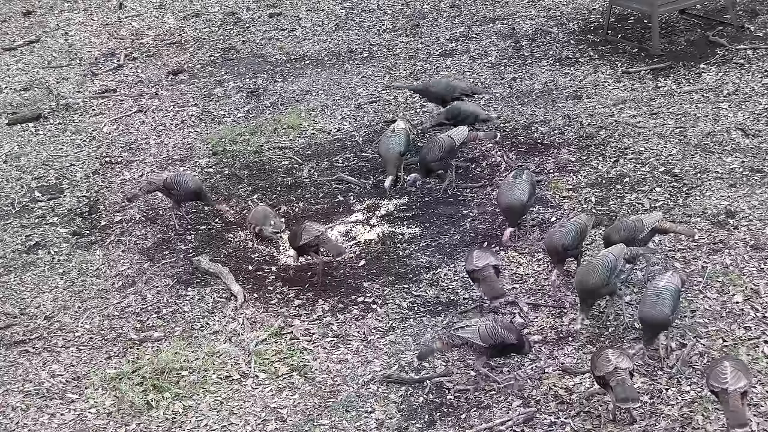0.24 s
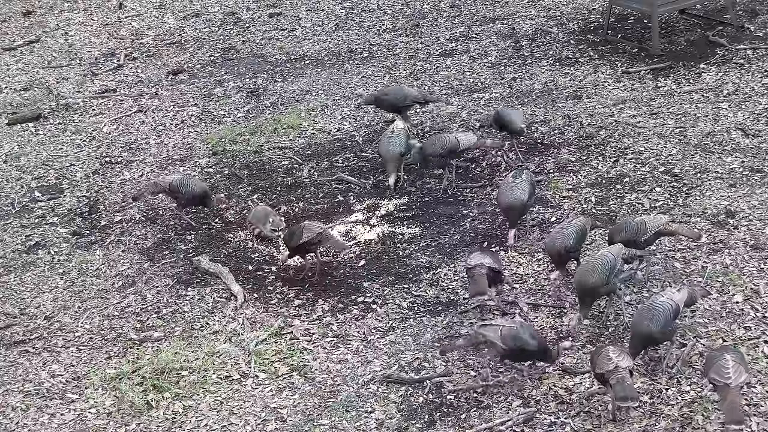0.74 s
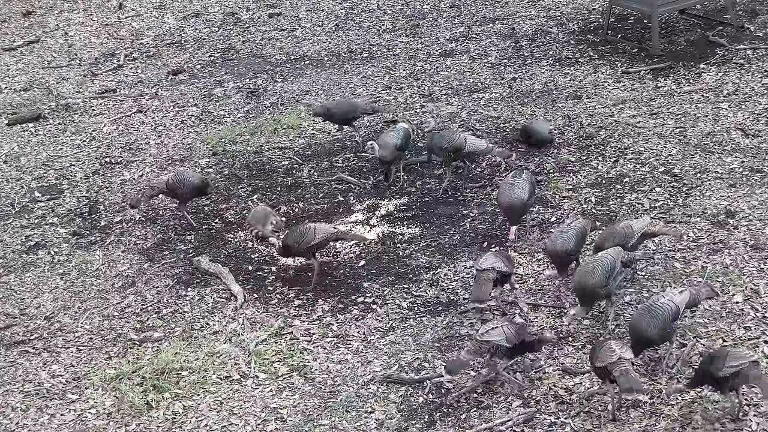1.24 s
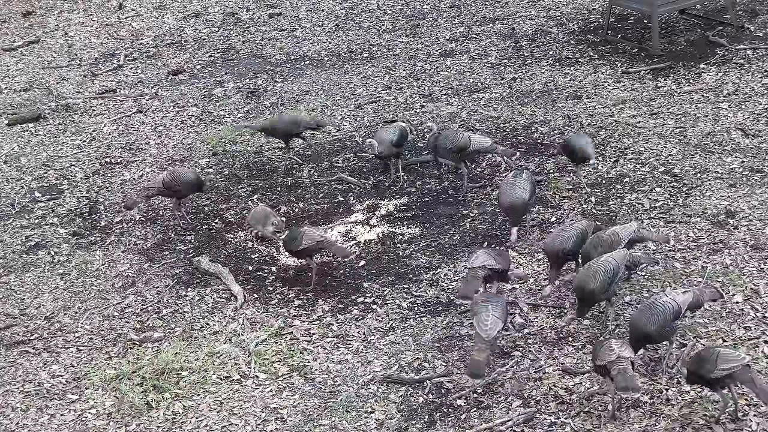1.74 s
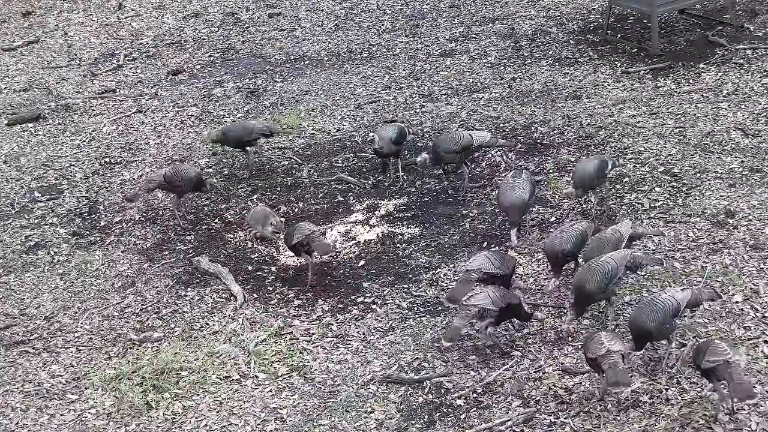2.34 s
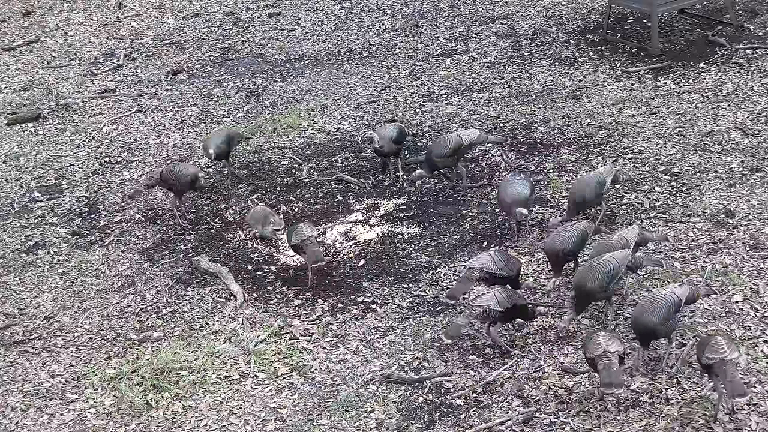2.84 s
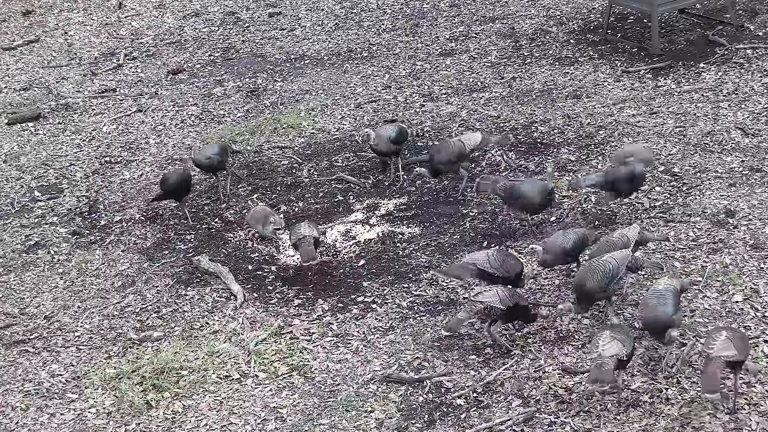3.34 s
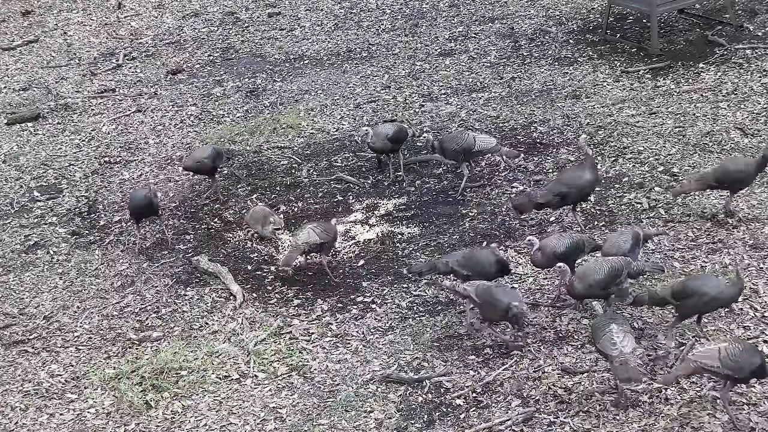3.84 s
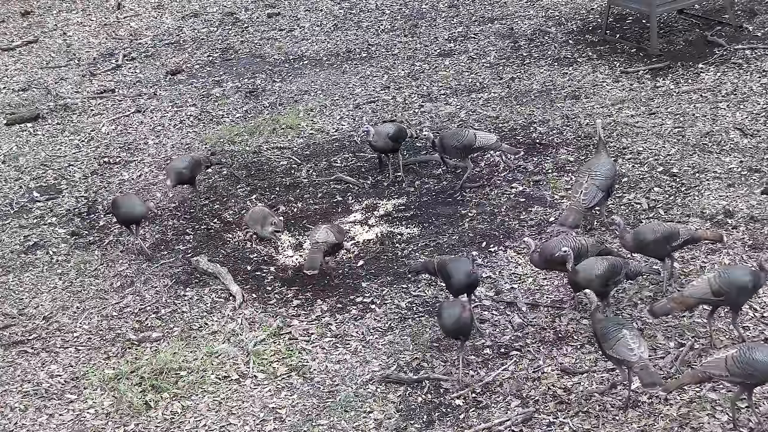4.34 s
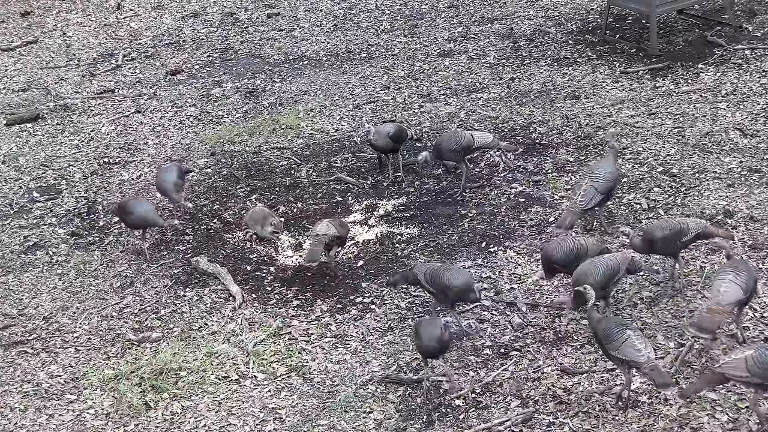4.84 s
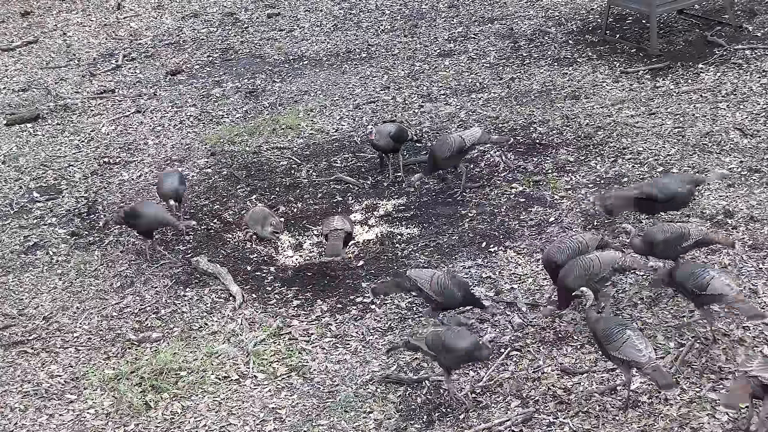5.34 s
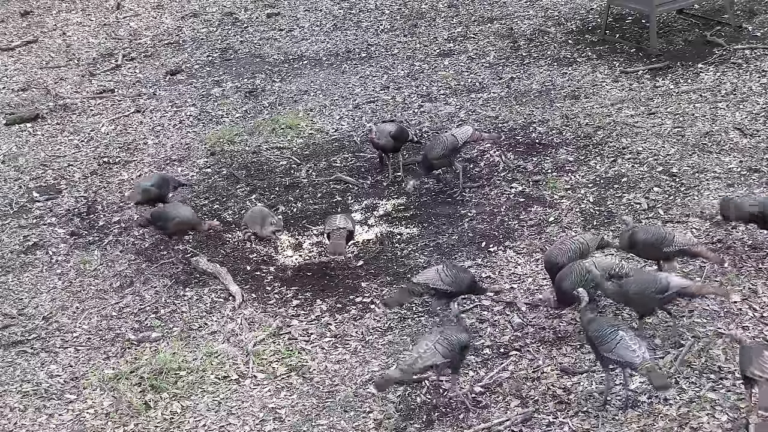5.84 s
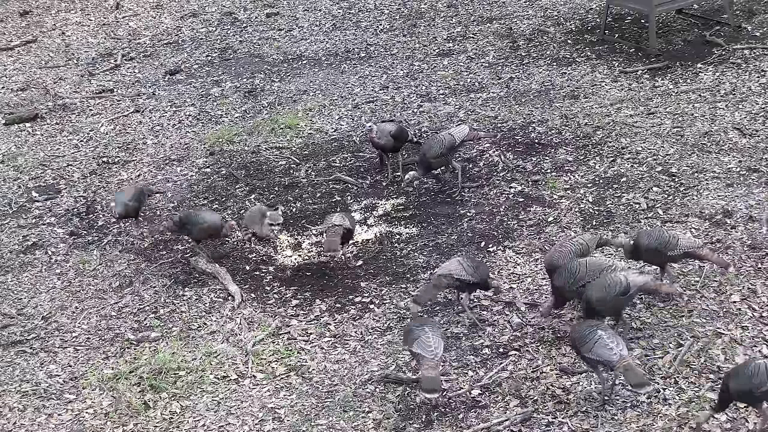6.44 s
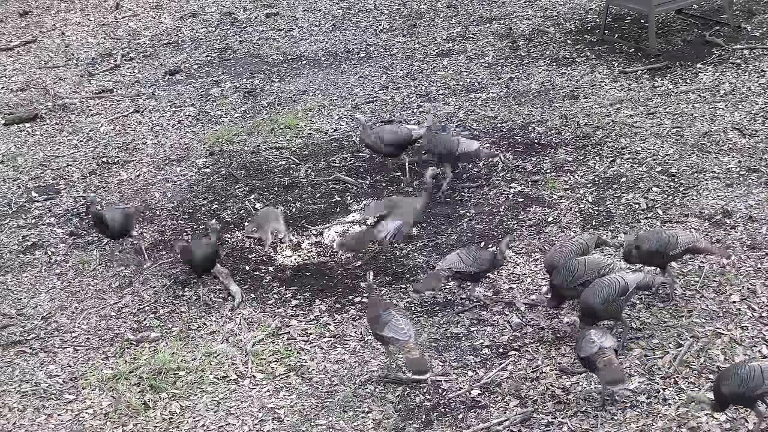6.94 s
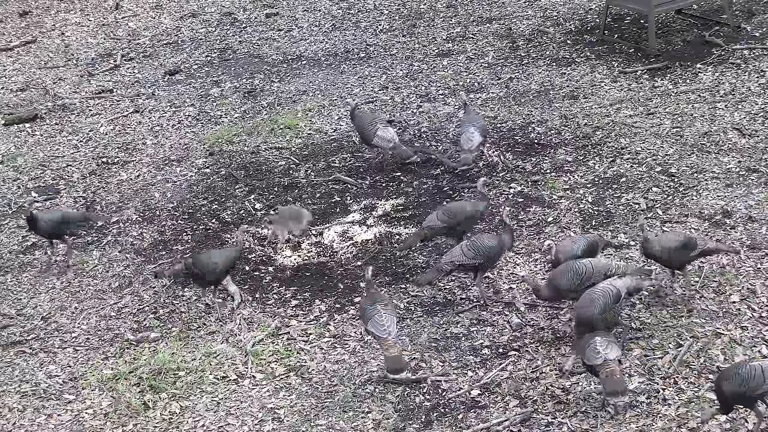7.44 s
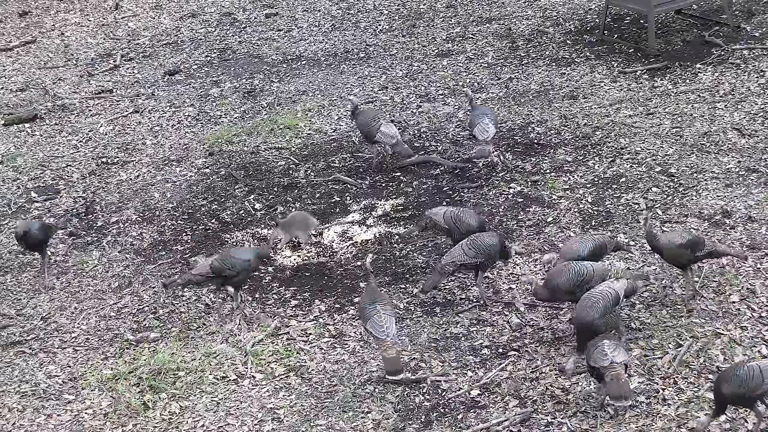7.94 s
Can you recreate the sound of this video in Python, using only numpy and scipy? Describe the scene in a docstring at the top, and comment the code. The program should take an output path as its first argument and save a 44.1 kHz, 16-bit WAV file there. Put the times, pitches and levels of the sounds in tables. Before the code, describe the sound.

Wild turkeys forage quietly on a woodland floor, heard almost in mono with a slight, dull echo. Throughout, many feet shuffle, crunch and rake through dry leaves, dotted with small beak knocks on corn and twigs and the bright snaps of leaf stalks. A low rumble lies underneath, and soft gusts buffet the microphone during the first two seconds. A handful of short, soft, whistled clucks bunch between the start and about 1.6 seconds. The rustling eases briefly, then at 3.2 seconds one bird flicks a wing, a quick crack of stiff feathers. The feet grow busier afterwards, with raking scratches around 3.5 to 4.7 seconds and faint clucks near 3.3 and 5 seconds. Pecks cluster from 5 to 7 seconds. The loudest cluck, very brief, comes at 6.8 seconds, and the rustling continues until the end at about 8 seconds.

```python
"""Wild turkeys feed on corn among dry leaves on a woodland floor, heard almost in mono.
Over a low rumble and early gusts of breeze, feet shuffle, crunch and rake through the litter.
Soft whistled clucks bunch in the first two seconds; beaks knock on kernels and twigs, leaf stalks snap.
At 3.2 s one bird flicks a wing, stiff feathers slapping past one another, and the feet grow busier.
The loudest cluck comes at 6.8 s, and the rustling carries on to the end."""
import sys
import numpy as np
from scipy import signal
from scipy.fft import rfft, irfft
from scipy.io import wavfile

SR = 44100
rng = np.random.default_rng(int(sys.argv[2]) if len(sys.argv) > 2 else 0)


def to_wav(sig):
    """Store sig (one row per channel, or 1-D mono) as 16-bit WAV at the path in sys.argv[1].

    Samples outside -1..1 are clipped; the rate is SR.
    """
    pcm = np.clip(np.atleast_2d(sig), -1, 1) * 32767
    pcm = np.round(pcm).astype(np.int16)
    wavfile.write(sys.argv[1], SR, pcm.T)  # frames by channels


N = 361619

# how busy the flock's feet are: (time [s], rustle level [dB])
FLOCK_ACTIVITY = [(0, -71), (0.25, -55), (1.3, -59), (1.63, -62), (2.05, -51.5), (2.3, -61.5), (3.0, -61),
                  (3.35, -51), (3.68, -51), (3.87, -49), (4.47, -57), (4.9, -54.5), (5.45, -50),
                  (6.0, -53.5), (6.22, -54.5), (6.85, -50.5), (7.01, -52.5), (7.2, -46.5), (7.45, -52),
                  (8.2, -54.5)]
# tone colour of a hard little snap: (frequency [Hz], relative level [dB])
SNAP_SPECTRUM = [(300, -17), (1000, -12), (2500, -8), (5000, 0), (6800, -2), (8400, 1), (10300, -7),
                 (13500, -4), (16000, -13)]


def gain_of(db):
    """Decibels to amplitude."""
    return 10 ** (np.asarray(db) / 20)


def unit_rms(x):
    """Scales to an rms of one."""
    return x / np.sqrt(np.mean(x ** 2) + 1e-20)


def eq_gain(spectrum, hz):
    """Gain of a (Hz, dB) spectrum, read on a log-frequency axis."""
    f, db = np.transpose(spectrum)
    return gain_of(np.interp(np.log(hz + 1), np.log(f + 1), db))


def curve(rows):
    """A (time, value) control curve at every sample."""
    return np.interp(np.arange(N) / SR, *np.transpose(rows))


def add(mix, s, sound):
    """Mixes a sound in at s seconds."""
    part = mix[max(round(s * SR), 0):][:len(sound)]
    part += sound[:len(part)]


def wander(hz):
    """Random drift of rms one, rolling off above the given rate."""
    f = np.fft.rfftfreq(N, 1 / SR)
    return unit_rms(irfft(rfft(rng.standard_normal(N)) / (1 + (f / hz) ** 4), N))


def noise(spectrum):
    """Steady noise with the given spectrum."""
    gain = eq_gain(spectrum, np.fft.rfftfreq(N, 1 / SR))
    return unit_rms(irfft(rfft(rng.standard_normal(N)) * gain, N))


def click(spectrum, size=2048):
    """A minimum-phase click of energy one with the given spectrum."""
    log_gain = np.log(eq_gain(spectrum, abs(np.fft.fftfreq(size, 1 / SR))))
    pulse = np.fft.ifft(np.exp(np.conj(signal.hilbert(log_gain)))).real[:size // 2]
    return pulse / np.linalg.norm(pulse)


def woodland_air(hush_db=-48.5, swell_db=1.1, breeze_trim_db=-2):
    """A bed of distant rumble and hush, with a soft breeze buffeting the microphone."""
    # still air: (frequency [Hz], relative level [dB])
    hush_spectrum = [(15, -3.5), (55, -2.5), (110, -8.5), (200, -12), (320, -16), (600, -21.5), (1100, -27),
                     (1600, -37), (3500, -53.5), (5000, -30.5), (10000, -54.5), (16000, -50)]
    # breeze, gusty at first, with one late puff: (time [s], relative level [dB])
    gusts = [(0, -51.5), (0.2, -30.5), (0.45, -47), (1.2, -35.5), (1.55, -45), (1.9, -39.5), (2.4, -48.5),
             (6.3, -57.5), (6.85, -44.5), (8.2, -58.5)]
    breeze = noise([(3, -5.5), (10, 3.5), (20, 0.5), (40, -19), (70, -18), (130, -27), (2000, -71)])
    hush = gain_of(hush_db + swell_db * wander(5.7)) * noise(hush_spectrum)
    return hush + gain_of(curve(gusts) + breeze_trim_db) * breeze


def capsule_hiss(level_db=-82):
    """Faint self-noise of the two microphone capsules."""
    # colour of the hiss: (frequency [Hz], relative level [dB])
    hiss_spectrum = [(100, 9), (500, 24), (2500, -11.5), (16000, 6)]
    return gain_of(level_db) * noise(hiss_spectrum)


def leaf_crackle(per_s, spread_db, clump_db, ring_share, hold_s=.004, count=16):
    """Tiny fractures in clumps: one leaf gives way, ringing at its own pitch, then another."""
    # dry leaves breaking: (frequency [Hz], relative level [dB])
    leaf_spectrum = [(150, -12), (500, -5.5), (1000, -3), (1800, -4.5), (2850, -1.5), (3700, -4.5),
                     (4900, -1.5), (6700, -5.5), (8400, -1.5), (10400, -14), (13400, -10), (16000, -26)]
    size = rng.standard_normal(N)
    size *= gain_of(spread_db * np.minimum(rng.exponential(1, N), 4) + clump_db * wander(90))
    fractures = size * (rng.random(N) < per_s / SR)
    leaf_order = rng.integers(0, count, N)
    next_leaf = rng.random(N) < 1 / (hold_s * SR)
    leaf = leaf_order[np.cumsum(next_leaf) % N]
    t, out = np.arange(200) / SR, np.zeros(N)
    for k, hz in enumerate(np.geomspace(1500, 11000, count) * rng.uniform(0.87, 1.0, count)):
        grain = np.exp(-t * hz / 1.8) * np.cos(2 * np.pi * hz * t)
        grain *= ring_share * np.sqrt(hz / 5000) / np.linalg.norm(grain)
        grain[0] += .5  # the crack ahead of the ring
        out += np.convolve(fractures * (leaf == k), grain)[:N]
    return unit_rms(signal.oaconvolve(out, click(leaf_spectrum))[:N])


def flock_shuffle(nudges_per_s=50, nudge_s=0.0089, steady_share=0.56, thud_db=-9, snap_db=-14):
    """Many feet stir the litter: a steady sift, small nudges, dry snaps and soft thuds on the soil."""
    kicks = np.minimum(rng.exponential(1, N), 2) * (rng.random(N) < nudges_per_s / SR)
    nudges = signal.lfilter([1], [1, -np.exp(-1 / (nudge_s * SR))], kicks)
    stir = np.sqrt(steady_share + (1 - steady_share) * nudges / nudges.mean())
    leaves = leaf_crackle(per_s=7000, spread_db=1.0, clump_db=-0.37, ring_share=0.13)
    snaps = unit_rms(signal.oaconvolve(np.sqrt(kicks), click(SNAP_SPECTRUM))[:N])  # one per nudge
    soil = noise([(25, -15), (70, 4.5), (190, -2), (400, -8.5), (2000, -47)])
    rustle = stir * (leaves + gain_of(thud_db) * soil) + gain_of(snap_db) * snaps
    return gain_of(curve(FLOCK_ACTIVITY)) * rustle


def clucks(trim_db=-1.5, arch_octaves=0.1384, shake_depth=0.087, bite_db=20, send_cap_db=-49):
    """Short whistled notes that arch in pitch; rough ones shake, rasp and grow overtones."""
    # calls: (time [s], length [s], relative level [dB], start pitch [Hz], end pitch [Hz], roughness [0-1])
    calls = [(0.071, 0.071, -49, 922, 550, 0.42), (0.198, 0.049, -51.5, 852, 850, 0.4),
             (0.956, 0.042, -47, 850, 1190, 0.26), (.996, .024, -52, 1126, 820, 0.55),
             (1.144, 0.013, -48.5, 873, 1200, 0), (1.191, 0.035, -52.5, 923, 780, 0.5),
             (1.214, 0.037, -50.5, 860, 1200, 0.26), (1.261, 0.04, -53, 1065, 760, 0.5),
             (1.298, .115, -54.5, 784, 640, 0.51), (1.586, 0.033, -52, 858, 860, 0.22),
             (3.332, .12, -55.5, 840, 450, 0.49), (5.039, 0.023, -53.5, 625, 430, 0.13),
             (6.834, 0.0128, -33.5, 1180, 520, 0.52), (6.849, 0.013, -41.5, 1002, 550, 0.68)]
    out, send = np.zeros(N), np.zeros(N)
    shake, flutter, rasp = wander(166), wander(130), wander(680)
    for s, length, db, start_hz, end_hz, rough in calls:
        progress = np.linspace(0, 1, int(length * SR))
        at = int(s * SR) + np.arange(len(progress))
        hz = start_hz * (end_hz / start_hz) ** progress * 2 ** (arch_octaves * np.sin(np.pi * progress))
        phase = 2 * np.pi * np.cumsum(hz * (1 + shake_depth * rough * shake[at])) / SR
        overtones = gain_of(-24) * np.sin(2 * phase) + gain_of(-26) * np.sin(3 * phase)
        note = np.sin(phase) + gain_of(bite_db * rough) * overtones
        swell = signal.windows.tukey(len(at), .35) * np.exp(rough * flutter[at] - .5 * progress)
        call = gain_of(trim_db) * unit_rms(note * swell * (1 + rough * rasp[at]))
        add(out, s, gain_of(db) * call)
        add(send, s, gain_of(min(db, send_cap_db)) * call)  # loud calls are near, and so drier
    return out + trunk_echo(send, wet_db=-5, t60=.26)


def footwork(step_rise_share=0.2, scratch_rise_share=0.58, scratch_body_db=-2.5, crossover_hz=3600):
    """Pressure builds fast in a footfall, slowly in a scratch; weight crushes the duller leaves below."""
    # crunching steps: (time of peak [s], level [dB], length [s], gain below the crossover [dB])
    footfalls = [(0.102, -42, 0.034, -4.5), (0.473, -42.5, 0.038, 1), (0.563, -45, 0.022, -3.5),
                 (0.648, -36.5, 0.013, 1.5), (0.997, -40.5, .018, -4), (1.238, -41, 0.012, 2),
                 (1.35, -34.5, 0.0052, -3.5), (1.711, -44, 0.015, -2.5), (1.918, -42.5, 0.0052, 6),
                 (2.036, -37.5, 0.02, -8), (2.209, -42.5, 0.012, 1), (2.509, -36, 0.011, -4.5),
                 (3.135, -40, 0.007, -4), (3.175, -41.5, 0.018, 2), (3.335, -37.5, 0.0076, -7),
                 (3.419, -47.5, 0.015, 7), (3.489, -45, 0.027, 4), (3.584, -42.5, .008, 3),
                 (3.721, -40.5, 0.014, 1.5), (3.771, -39, 0.018, -1.5), (4.987, -41.5, 0.022, 2),
                 (5.194, -34.5, 0.027, -3), (5.321, -47, 0.022, 9.5), (5.398, -42, 0.023, -7),
                 (5.807, -40.5, 0.014, 1.5), (5.934, -39.5, 0.05, -3.5), (6.086, -39, 0.028, -0.5),
                 (6.125, -43, 0.028, 3.5), (6.666, -35.5, 0.0091, -2.5), (6.803, -56, 0.034, 16),
                 (6.865, -44.5, .025, 0.5), (6.94, -43, 0.036, 1.5), (7.067, -38.5, 0.029, -0.5),
                 (7.141, -44, 0.032, 7.5), (7.312, -42.5, 0.025, 3.5), (7.926, -45.5, 0.018, 3)]
    # a foot rakes through the leaves: (time of peak [s], level [dB], length [s])
    scratches = [(0.756, -48, 0.19), (1.165, -47.5, 0.07), (1.308, -46.5, 0.24), (1.531, -47, 0.053),
                 (2.53, -47, 0.12), (3.538, -42, 0.058), (3.996, -41.5, 0.11), (4.153, -43, 0.058),
                 (4.305, -44, 0.15), (4.372, -43, 0.054), (4.543, -44.5, 0.033), (4.72, -50, 0.17),
                 (5.516, -43.5, 0.11), (5.882, -42.5, 0.053), (6.3, -43, 0.044), (6.746, -43, 0.044)]
    strokes = [(*row, step_rise_share) for row in footfalls]
    strokes += [(*row, scratch_body_db, scratch_rise_share) for row in scratches]
    t, top_power, body_power = np.arange(N) / SR, np.zeros(N), np.zeros(N)
    for s, db, length, body_db, rise_share in strokes:
        rise, fall = length * rise_share, length * (1 - rise_share)
        span = slice(max(int((s - 5 * rise) * SR), 0), int((s + 5 * fall) * SR))
        pressure = gain_of(db) * np.exp(-np.maximum((s - t[span]) / rise, (t[span] - s) / fall))
        top_power[span] += pressure ** 2
        body_power[span] += (pressure * gain_of(body_db)) ** 2
    leaves = leaf_crackle(per_s=10000, spread_db=1.7, clump_db=0.85, ring_share=0.15)
    body = signal.sosfiltfilt(signal.butter(2, crossover_hz, fs=SR, output="sos"), leaves)
    return (leaves - body) * np.sqrt(top_power) + body * np.sqrt(body_power)


def knock(peak_db, hz, t60, contact_db=-1, contact_s=0.00052):
    """A beak's hard contact and the brief ring of what it strikes."""
    # ring of a struck twig: (multiple of its pitch [ratio], relative level [dB])
    twig_modes = [(.7, -8), (1, 3), (1.3, -8)]
    t = np.arange(1500) / SR
    tone = sum(gain_of(db - 60 * t * np.sqrt(ratio) / t60) * np.sin(2 * np.pi * hz * ratio * t)
               for ratio, db in twig_modes)
    tone += gain_of(contact_db) * rng.standard_normal(len(t)) * np.exp(-t / contact_s)
    return gain_of(peak_db) * tone / abs(tone).max()


def beak_pecks(stray_count=70, stray_boost_db=12):
    """The near birds' pecks, and fainter stray ones whose level follows the flock's rustle."""
    # beaks on kernels and twigs: (time [s], peak level [dB], pitch [Hz])
    near_pecks = [(.154, -30.5, 960), (.2502, -40.5, 3020), (0.321, -33, 1050), (.6497, -26, 1330),
                  (1.0018, -43, 990), (2.2234, -34.5, 2740), (2.4408, -39, 2500), (3.221, -30, 1000),
                  (3.4893, -28, 644), (3.583, -32.5, 2170), (3.7242, -28, 3100), (4.776, -36.5, 2400),
                  (5.134, -28.5, 3150), (5.289, -33, 2860), (5.3476, -33, 2420), (5.4128, -29.5, 1880),
                  (6.3228, -33, 1900), (6.482, -32.5, 3280), (6.5169, -31, 2940), (6.709, -30, 2070),
                  (6.7227, -31, 2430), (6.7523, -32, 3050), (6.799, -29, 2550), (6.815, -34, 2530),
                  (6.9355, -27, 2900), (7.116, -35, 1600), (7.1303, -29.5, 1800), (7.927, -30, 2770)]
    out, rustle_db = np.zeros(N), curve(FLOCK_ACTIVITY)
    for s, db, hz in near_pecks:
        add(out, s, knock(db, hz, t60=.012))
    for when, pitch, size in rng.random((stray_count, 3)):
        at = int(when * N)
        stray = knock(rustle_db[at] + stray_boost_db, hz=2000 * 4 ** pitch, t60=.004)
        add(out, at / SR, (.5 + size) * stray)
    return out


def stalk_snaps(trim_db=-1, colour_spread_db=1.8, spray_gain=.2, spray_s=0.0016, lag_s=0.00064):
    """Leaf stalks break, each with its own bright colour and a very short spray of fragments."""
    # breaking stalks: (time [s], relative peak level [dB])
    breaks = [(0.3216, -31), (0.4673, -20), (1.001, -28), (1.3444, -24), (2.034, -27), (2.5106, -41),
              (2.8824, -33), (3.3363, -27), (3.774, -27), (4.2645, -27.5), (4.691, -31), (5.1462, -25),
              (5.189, -26), (5.4626, -25), (5.561, -29), (5.68, -30), (5.808, -26), (6.0887, -34),
              (6.402, -35), (6.4303, -24), (6.518, -42), (6.709, -30), (7.527, -38), (7.6577, -33),
              (7.9265, -29)]
    out, t = np.zeros(N), np.arange(500) / SR
    for s, db in breaks:
        colour = [(hz, level + colour_spread_db * rng.standard_normal()) for hz, level in SNAP_SPECTRUM]
        spray = spray_gain * rng.standard_normal(len(t)) * np.exp(-t / spray_s)
        spray[0] = 1  # the break itself
        snap = np.convolve(spray, click(colour))
        add(out, s + lag_s, gain_of(db + trim_db) * snap / abs(snap).max())
    return out


def wing_flick(puff_trim_db=-7, puff_s=0.0034, swirl=0.14):
    """Stiff feathers crack past one another in a quick run; each pushes a swirling puff of air."""
    # feather slaps: (time [s], peak level of the crack [dB], relative level of the puff [dB])
    slaps = [(3.246, -30, -30.5), (3.25, -19.5, -26), (3.2552, -16.5, -27.5), (3.259, -16, -46),
             (3.2645, -29, -25.5), (3.268, -21, -38)]
    # air pushed by the wing: (frequency [Hz], relative level [dB])
    puff_spectrum = [(70, -12), (230, 3), (400, -2), (650, -1), (950, 0.5), (1300, -11), (2500, -8.5),
                     (8000, -29.5)]
    out, t = np.zeros(N), np.arange(700) / SR
    crack = click([(100, -25), (1000, -5.5), (8500, -1), (10500, -18), (16000, -31)])
    for s, crack_db, puff_db in slaps:
        gust = swirl * rng.standard_normal(len(t)) * np.exp(-t / puff_s)
        gust[0] = rng.choice([-1, 1])
        puff = np.convolve(gust, click(puff_spectrum))[:len(t)]
        add(out, s, gain_of(puff_db + puff_trim_db) * unit_rms(puff))
        add(out, s, gain_of(crack_db) * crack / abs(crack).max())
    return out


def trunk_echo(x, wet_db, t60, echoes_per_s=1500, predelay_s=.008, band_hz=(270, 6500)):
    """Trunks scatter a thin, dull echo; returns the wet signal alone."""
    t = np.arange(SR) / SR
    taps = rng.standard_normal(SR) * (rng.random(SR) < echoes_per_s / SR)
    taps *= (t > predelay_s) * gain_of(-60 * t / t60)
    tail = signal.sosfilt(signal.butter(2, band_hz, "band", fs=SR, output="sos"), taps)
    tail *= .5 / np.linalg.norm(tail)
    return gain_of(wet_db) * signal.oaconvolve(x, tail)[:N]


def scene():
    """The flock sits dead centre; only the capsule hiss differs between the channels."""
    litter = flock_shuffle() + footwork() + stalk_snaps() + beak_pecks()
    litter += trunk_echo(litter, wet_db=-17, t60=0.27)
    wing = wing_flick()
    wing += trunk_echo(wing, wet_db=-5.5, t60=0.18)
    mid = litter + clucks() + wing + woodland_air()
    side = capsule_hiss()
    return np.array([mid + side, mid - side])


def record(dry):
    """A steep low-pass at 15.9 kHz takes off the very top."""
    low_pass = signal.firwin(511, 15900, window=("kaiser", 9), fs=SR)
    return signal.oaconvolve(dry, low_pass[None], "same")


dry = scene()
out = record(dry)
to_wav(out)
```